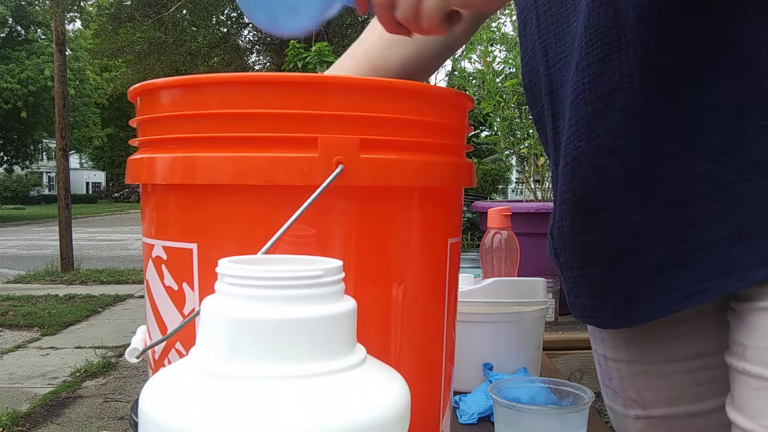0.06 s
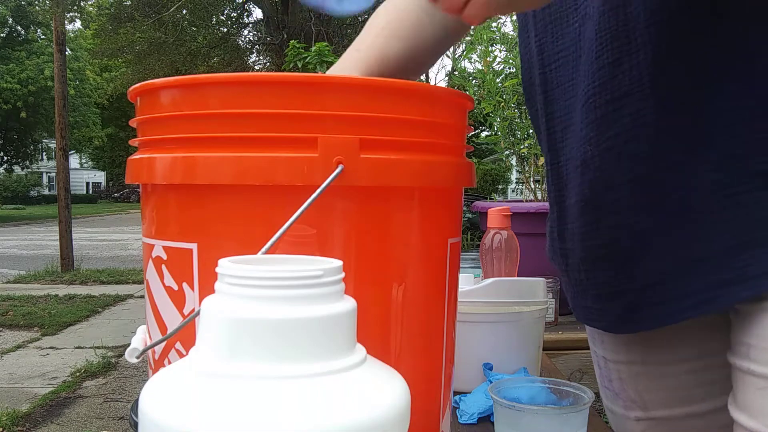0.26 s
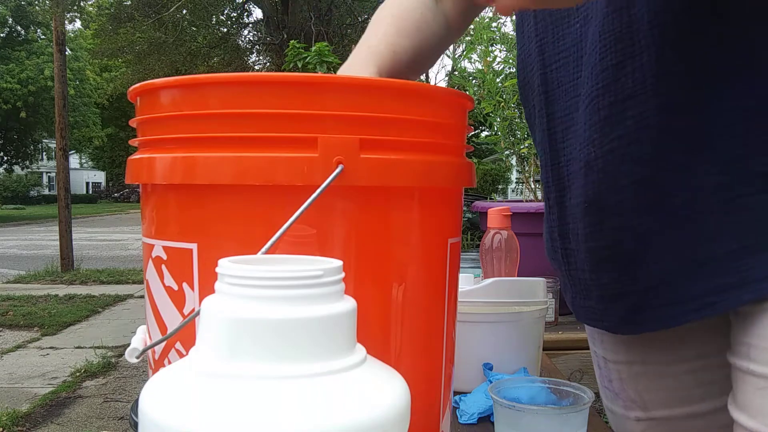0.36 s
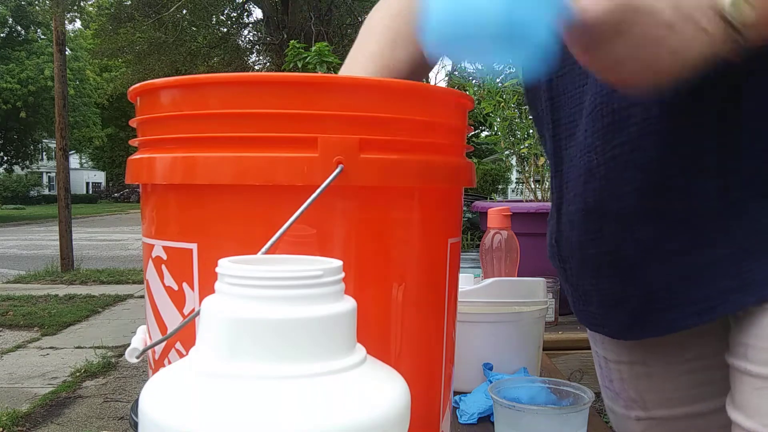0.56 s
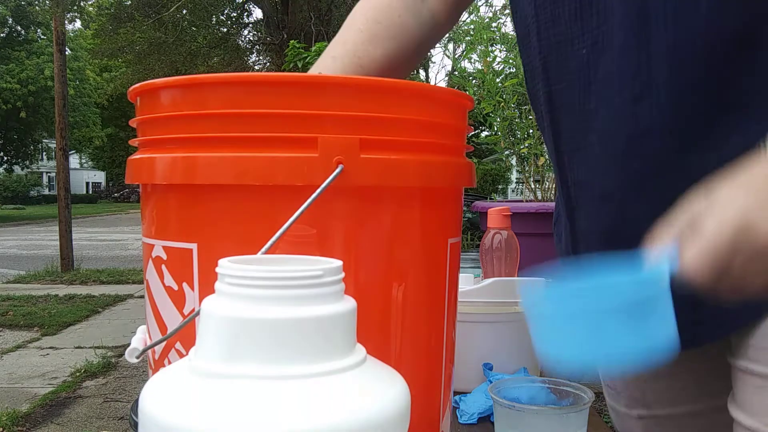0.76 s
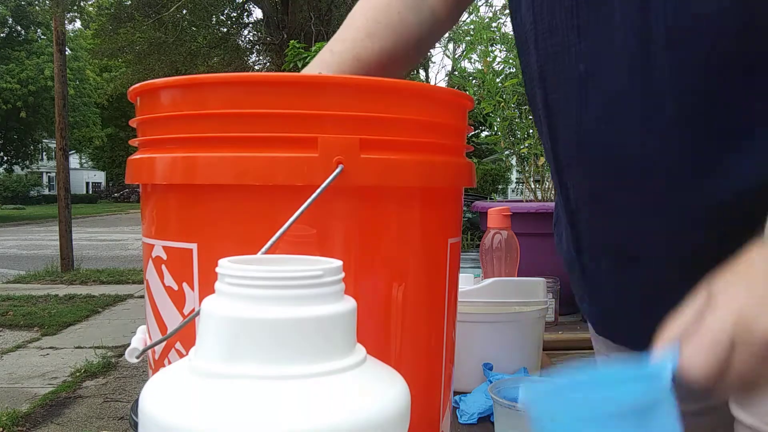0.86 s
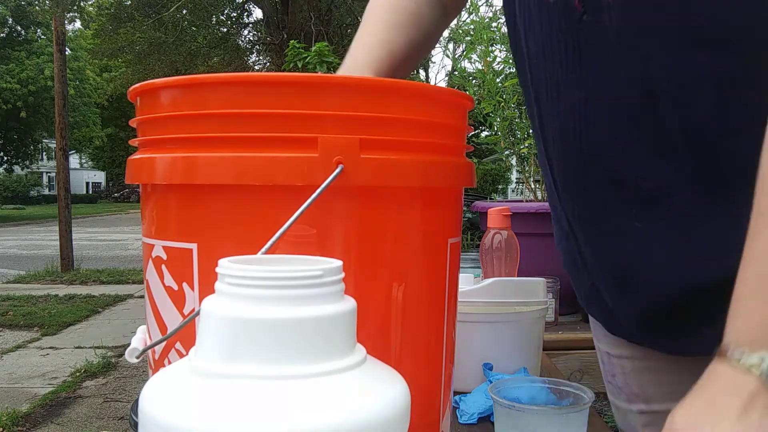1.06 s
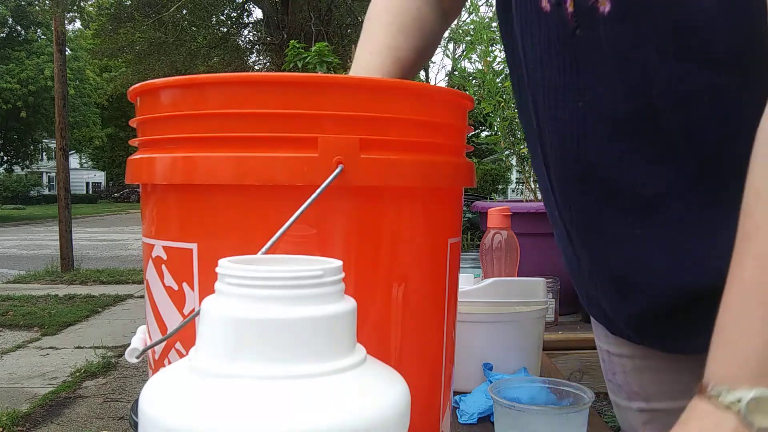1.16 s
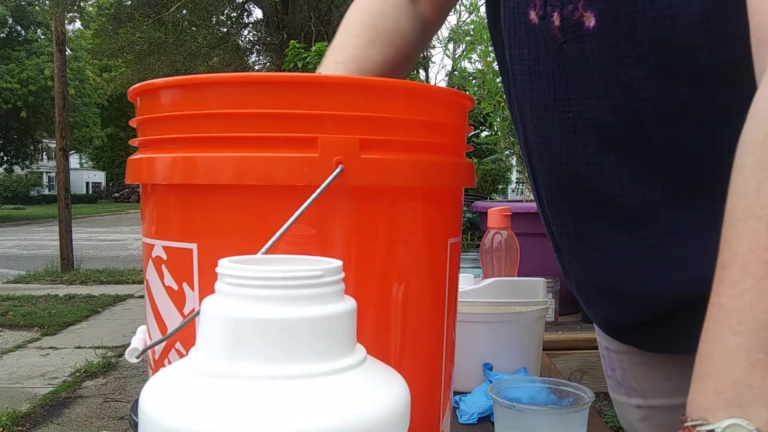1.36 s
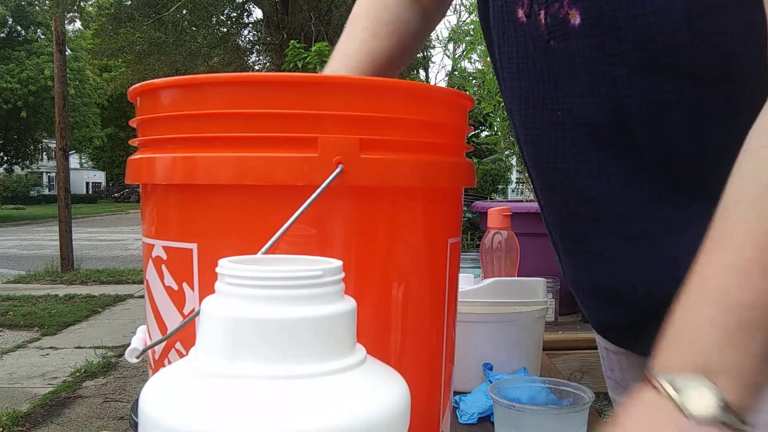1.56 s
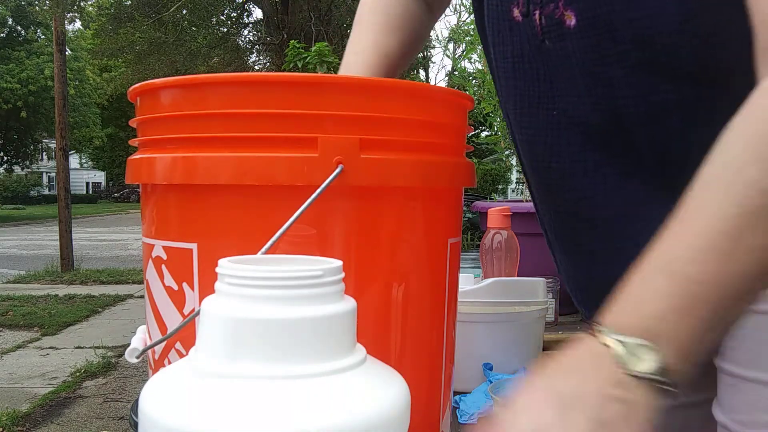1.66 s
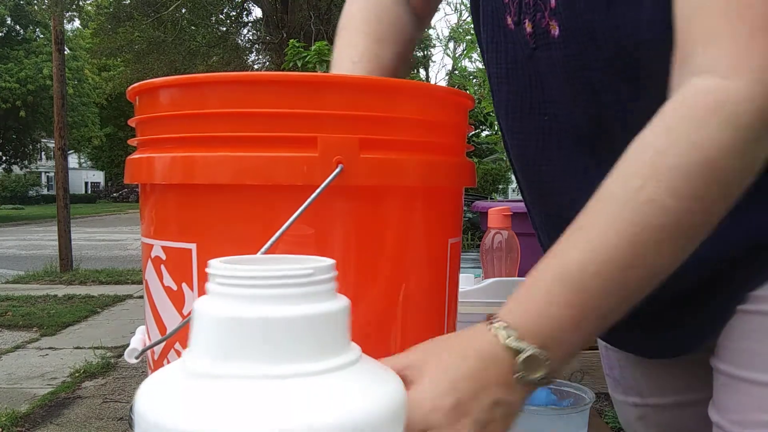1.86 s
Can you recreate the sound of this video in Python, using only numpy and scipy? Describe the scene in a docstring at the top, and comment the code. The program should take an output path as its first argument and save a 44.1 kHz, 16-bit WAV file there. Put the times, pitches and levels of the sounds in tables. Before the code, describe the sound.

Close and dry, a utensil clacks sharply on a hollow plastic bucket, then drags in uneven raspy strokes with small squeaks and duller bumps. Outdoors, a soft early hiss fades over quiet far traffic.

```python
"""A utensil stirs powder into water in a plastic bucket, outdoors and close by.
It knocks on the wall (decaying sines plus damped noise), then drags in gritty stick-slip strokes
(random pulses through wall filters); both ring the same bucket modes.
Now and then it springs free with a clink of its own modes, or squeaks and groans as a wavering tone.
Behind it: distant traffic and a fading hiss (filtered noise), one faint bird (a falling tone)."""
import sys
import numpy as np
from scipy import signal
from scipy.fft import rfft, irfft
from scipy.io import wavfile
from scipy.ndimage import uniform_filter1d, map_coordinates

SR = 44100
rng = np.random.default_rng(int(sys.argv[2]) if len(sys.argv) > 2 else 0)


def persist_wave(psi):
    """Save psi, clipped to +-1, as 16-bit WAV."""
    counts = np.round(np.clip(psi, -1, 1) * 32767).astype(np.int16)
    wavfile.write(sys.argv[1], SR, np.atleast_2d(counts).T)


N = 83790
TOP_HZ = 15850
CHATTER_HZ = 130  # rate of the fast level wander

# blows of the utensil: (time [s], ring level [dB], clack level [dB], hardness low-pass [Hz],
# bass cut [Hz], ring length [share of free t60])
BLOWS = [(0.1223, -63, -43.5, 14100, 199, 0.44), (.228, -44, -14.5, 5500, 890, 0.97),
         (.231, -14.5, -15.5, 3060, 280, 0.73), (0.243, -49, -29.5, 10000, 200, 0.49),
         (0.2541, -30, -25.5, 9700, 400, 0.2), (0.2709, -39, -29.5, 5000, 900, .4),
         (0.2847, -28.5, -23, 4530, 134, 0.9), (0.3169, -33, -32, 5200, 140, 0.89),
         (0.3423, -38, -29.5, 2980, 405, 0.53), (0.391, -36.5, -27, 1480, 1410, 1.6),
         (0.5575, -53, -37, 4950, 617, 1), (.632, -42.5, -37.5, 5000, 686, 1.5),
         (0.735, -37, -33.5, 9800, 496, 0.7), (.830, -61, -26.5, 8400, 4000, .8),
         (0.8309, -24.5, -25.5, 875, 600, 1.06), (1.001, -53, -30, 7700, 1490, 0.62),
         (1.3025, -12, -60, 1250, 1040, 0.32), (1.481, -20, -24.5, 3200, 476, 0.45),
         (1.4855, -15, -21.5, 1840, 890, 0.41), (1.691, -37, -24, 2440, 1010, 0.99),
         (1.811, -22.5, -39, 1250, 1050, 0.24), (1.8215, -28.5, -38, 1300, 600, 0.21),
         (1.8845, -37, -28.5, 4100, 600, 1.5)]
THUMP_S, THUMP_HZ, THUMP_T60_S, THUMP_DB = 0.229, 52, 0.05, -50


def knocks():
    """Each blow clacks and rings: soft contact loses treble, a glancing one bass; the hardest thumps."""
    out = np.zeros(N)
    t = np.arange(12288) / SR
    for start_s, ring_db, clack_db, hard_hz, low_hz, length in BLOWS:
        ringing = undb(ring_db) * 0.5 * ring(t, length)
        blow = ringing + undb(clack_db) * clack(t)
        blow = signal.lfilter(*signal.butter(2, low_hz, "high", fs=SR), blow)
        add(out, start_s, soften(cut_bass(blow), hard_hz))
    # the hardest blow rocks the whole bucket
    thump = np.sin(2 * np.pi * THUMP_HZ * t) * decay(t, THUMP_T60_S)
    add(out, THUMP_S, undb(THUMP_DB) * thump)
    return out


# ringing modes of the bucket: (frequency [Hz], level [dB], free t60 [s])
BUCKET_MODES = [(283.6, -19, 0.26), (374, -22.5, 0.19), (681, -3, 0.091), (782, 1.5, 0.14),
                (1091, -6.5, 0.12), (1154, -1.5, 0.081), (1246, -2, 0.13), (1401, -0.5, 0.05),
                (1820, -11, 0.063), (2140, -8.5, 0.057), (2960, -4.5, 0.11)]


def ring(t, length):
    """Bucket modes after one push; a utensil that stays on the wall shortens them."""
    out = np.zeros(len(t))
    for k, (hz, db, t60_s) in enumerate(BUCKET_MODES):
        sign = (-1) ** (k // 2)
        out += sign * undb(db) * np.sin(2 * np.pi * hz * t) * decay(t, t60_s * length)
    return out


# dense, quickly damped vibration of the plastic wall: (frequency [Hz], level [dB])
WALL_SPECTRUM = [(60, -74), (140, -19), (220, -8.5), (750, -6.5), (1400, 1), (2100, -8.5), (3100, 0),
                 (3500, -11.5), (6000, -6), (8500, -13), (15500, -18)]
# t60 at 1 kHz; it shortens as frequency to the power CLACK_DAMPING
CLACK_ATTACK_S, CLACK_T60_S, CLACK_DAMPING = 0.0013, 0.074, 0.51


def clack(t):
    """Countless wall modes, as noise, that build up fast and die sooner the higher they are."""
    noise = rng.standard_normal(len(t))
    spectrum = rfft(noise)
    hz = np.arange(len(spectrum)) * SR / len(t)
    octave = np.log2(np.clip(hz, 125, 16000) / 1000)
    out = np.zeros(len(t))
    for k in np.arange(-3, 5):  # octaves from 1 kHz
        weight = np.maximum(1 - abs(octave - k), 0)
        band = irfft(spectrum * weight, len(t))
        out += band * decay(t, CLACK_T60_S / 2 ** (k * CLACK_DAMPING))
    out *= np.minimum(t / CLACK_ATTACK_S, 1)
    return colour(out, WALL_SPECTRUM) / np.std(colour(noise, WALL_SPECTRUM))


# strokes along the wall, one list each:
# (time [s], rasp level [dB], treble relative to rasp [dB], bass relative to rasp [dB])
WALL_STROKES = [
    [(.25, -33.5, -17, -2), (.312, -36.5, -17, -2.5), (.37, -55.5, -18, -6)],
    [(.566, -45.5, -7.5, -24), (.595, -63, -35, -13)],
    [(.634, -34, -12, -14), (.688, -34, -17, -15), (.722, -42, -13.5, -16), (.756, -42.5, -8, -10),
     (.786, -55, -12, -5)],
    [(.84, -37, -12, -16), (.878, -45.5, -1.5, -11), (.898, -49, -26, -45)],
    [(1.004, -42.5, 1.5, -17), (1.022, -40, -11.5, -10.5), (1.045, -45, -8, -16), (1.108, -39, -14.5, -15),
     (1.132, -55, -49, 4)],
    [(1.301, -49, -4.5, 11.5), (1.352, -38, -13, -18), (1.368, -32.5, -12, -16.5),
     (1.426, -32.5, -15.5, -13), (1.455, -35.5, -16.5, -30), (1.468, -32.5, -11, -13.5),
     (1.566, -28.5, -16, -15.5), (1.605, -38, -6.5, -17.5), (1.675, -44.5, -8.5, -22),
     (1.708, -47, -13, -5), (1.735, -71, -29, 10)],
    [(1.776, -34.5, -12.5, -6), (1.798, -47.5, -9.5, 1), (1.853, -44.5, -10, -9.5), (1.866, -42.5, -7, -12)],
]
# wall rasp, grit hiss and wall flexing: (frequency [Hz], level [dB])
RASP_SPECTRUM = [(250, -32.5), (520, -10), (715, -4), (810, -1.5), (1350, 6.5), (1700, 3.5), (1950, -2),
                 (2250, 2), (2650, -6.5), (3050, -3.5), (3500, -20), (5200, -40.5)]
GRIT_SPECTRUM = [(2200, -34.5), (3700, -0.5), (4400, -2), (5700, 1), (8500, -14), (15500, -37)]
FLEX_SPECTRUM = [(150, -5), (280, 4.5), (430, 8.5), (900, -49)]
RASP_DB, RASP_RING_DB, GRIT_DB, FLEX_DB = -1, -12, 0, -5
SLIPS_PER_S, SLIP_SPREAD_DB, CHATTER_DB = 3400, 3.3, 1.6
STROKE_FADE_S = 0.003


def scrapes():
    """The utensil catches and slips on powder grains: the wall rasps, rings and flexes, grit hisses."""
    t = np.arange(N) / SR
    steps = np.minimum(rng.exponential(size=N), 4)
    sizes = undb(SLIP_SPREAD_DB * steps) * np.sign(rng.standard_normal(N))
    happens = rng.random(N) < SLIPS_PER_S / SR
    slips = happens * sizes * undb(CHATTER_DB * walk(CHATTER_HZ))

    rasp, grit, flex = np.zeros((3, N))
    for stroke in WALL_STROKES:
        s, db, treble_db, bass_db = np.array(stroke).T
        gate = np.clip(1 + np.minimum(t - s[0], s[-1] - t) / STROKE_FADE_S, 0, 1)
        rasp += gate * undb(np.interp(t, s, db))
        grit += gate * undb(np.interp(t, s, db + treble_db))
        flex += gate * undb(np.interp(t, s, db + bass_db))

    modes = ring(t[:N // 4], length=0.77)
    paths = [(rasp, RASP_DB, lambda x: colour(x, RASP_SPECTRUM)),
             (rasp, RASP_RING_DB, lambda x: signal.fftconvolve(x, modes)[:N]),
             (grit, GRIT_DB, lambda x: colour(x, GRIT_SPECTRUM)),
             (flex, FLEX_DB, lambda x: colour(x, FLEX_SPECTRUM))]
    out = np.zeros(N)
    for force, db, body in paths:
        out += undb(db) * body(slips * force) / np.std(body(slips))
    return out


RIM_LAG_S, RIM_SWING_S, RIM_ECHO, TRAVEL_HZ = 0.0028, 0.00031, 0.5, 12


def rim_echoes(x):
    """Waves return from the rim; as the contact travels, delays move and resonances shift."""
    out = x
    for k in range(1, 3):
        lag_s = RIM_LAG_S * np.sqrt(k) + RIM_SWING_S * walk(TRAVEL_HZ)
        echo = map_coordinates(out, [np.arange(N) - lag_s * SR], order=3)
        out = out + RIM_ECHO * echo
    return out / (1 + RIM_ECHO ** 2)


BASS_CUT_HZ = 139


def cut_bass(x):
    """Steep high-pass: deep bass falls away below BASS_CUT_HZ."""
    return signal.sosfilt(signal.butter(6, BASS_CUT_HZ, "high", fs=SR, output="sos"), x)


# bending modes of the utensil: (frequency [Hz], level [dB])
UTENSIL_MODES = [(1635, 0.5), (2280, -5.5), (2570, -6), (3400, -13), (3870, -7.5), (4900, -9)]
# the edge catches and springs free: (time [s], level [dB], hardness low-pass [Hz])
SPRINGS_FREE = [(.827, -21, 7000), (1.769, -33, 2200)]
UTENSIL_ATTACK_S, UTENSIL_T60_S = 0.006, 0.045


def clinks():
    """The utensil's own modes swell and die quickly when its edge springs off the wall."""
    out = np.zeros(N)
    t = np.arange(N // 8) / SR
    modes = np.zeros(len(t))
    for hz, db in UTENSIL_MODES:
        modes += undb(db) * np.sin(2 * np.pi * (hz * t + rng.random()))
    clink = modes * np.minimum(t / UTENSIL_ATTACK_S, 1) * decay(t, UTENSIL_T60_S)
    for start_s, db, hard_hz in SPRINGS_FREE:
        add(out, start_s, undb(db) * soften(clink, hard_hz))
    return out


# slipping locked to one resonance: (time [s], length [s], mean pitch [Hz], mean level [dB])
SQUEAKS_AND_GROANS = [(.62, 0.18, 811, -40), (0.733, 0.077, 279, -47.5), (1.324, 0.038, 3140, -42.5),
                      (1.367, 0.099, 1073, -33.5), (1.773, 0.048, 292.6, -45), (1.84, 0.029, 3025, -41)]
SQUEAK_WAVER, SQUEAK_WAVER_HZ, SQUEAK_FLUTTER_DB = 0.03, 670, 3.5  # waver as a share of pitch


def squeaks():
    """Slipping locks to one resonance and sings unsteadily: squeaks when high, groans when low."""
    out = np.zeros(N)
    for start_s, length_s, hz, db in SQUEAKS_AND_GROANS:
        n = int(length_s * SR)
        pitch_hz = hz * (1 + SQUEAK_WAVER * walk(SQUEAK_WAVER_HZ)[:n])
        level_db = db + SQUEAK_FLUTTER_DB * walk(CHATTER_HZ)[:n]
        add(out, start_s, tone(pitch_hz, level_db))
    return out


# distant traffic: (frequency [Hz], level [dB])
STREET_SPECTRUM = [(81, -28), (332, -8.5), (808, 2.5), (3400, -20), (4420, -14.5), (15500, -32)]
STREET_DB, STREET_WANDER_DB, STREET_WANDER_HZ = -57, 1.0, 10.1


def traffic():
    """Distant traffic: filtered noise with a slightly wandering level."""
    level = undb(STREET_DB + STREET_WANDER_DB * walk(STREET_WANDER_HZ))
    return level * unit(colour(rng.standard_normal(N), STREET_SPECTRUM))


# soft hiss: (frequency [Hz], level [dB])
HISS_SPECTRUM = [(200, -25), (800, 12.5), (1300, -7.5), (5200, -8.5), (9000, -26)]
HISS_DB, HISS_HALVED_S, HISS_FADE_S = -51, 0.37, 0.19


def fading_hiss():
    """Soft filtered noise with a fluttering level that dies away early on."""
    t = np.arange(N) / SR
    hiss = undb(HISS_DB + walk(CHATTER_HZ)) * unit(colour(rng.standard_normal(N), HISS_SPECTRUM))
    return hiss * (1 - np.tanh((t - HISS_HALVED_S) / HISS_FADE_S)) / 2


CHIRP_S, CHIRP_LENGTH_S, CHIRP_HZ, CHIRP_FALL_HZ, CHIRP_DB = 0.778, 0.038, 4420, 380, -58


def bird():
    """One faint chirp: a tone of linearly falling pitch."""
    out = np.zeros(N)
    fall = np.linspace(0, 1, int(CHIRP_LENGTH_S * SR))
    add(out, CHIRP_S, tone(CHIRP_HZ - CHIRP_FALL_HZ * fall, CHIRP_DB))
    return out


def undb(db):
    """Decibels to gain."""
    return 10 ** (np.asarray(db) / 20)


def unit(x):
    """Scale to rms 1."""
    return x / np.sqrt(np.mean(x ** 2) + 1e-20)


def decay(t, t60_s):
    """Exponential decay by 60 dB in t60_s."""
    return np.exp(-np.log(1000) * t / t60_s)


def soften(x, hard_hz):
    """Low-pass for contact hardness: a softer contact excites less treble."""
    return signal.lfilter(*signal.butter(2, min(hard_hz, TOP_HZ), fs=SR), x)


def tone(hz, db):
    """A short swelling and fading tone along a pitch track."""
    return undb(db) * np.hanning(len(hz)) * np.sin(2 * np.pi * np.cumsum(hz) / SR)


def colour(x, points):
    """Causal minimum-phase filter through (frequency [Hz], level [dB]) points."""
    size = 4096
    hz, db = np.array(points, float).T
    grid_hz = np.arange(size // 2 + 1) * SR / size
    gain = undb(np.interp(np.log(grid_hz + 1), np.log(hz), db))
    # folding the cepstrum makes the response minimum-phase
    cep = irfft(np.log(gain))
    cep[1:size // 2] *= 2
    cep[size // 2 + 1:] = 0
    return signal.fftconvolve(x, irfft(np.exp(rfft(cep))))[:len(x)]


def walk(rate_hz):
    """Smooth random wandering with rms 1."""
    k = max(int(SR / rate_hz), 1)
    steps = np.repeat(rng.standard_normal(N // k + 1), k)
    return unit(uniform_filter1d(steps, k)[:N])


def add(out, start_s, x):
    """Mix a sound in at a given time."""
    i = max(int(start_s * SR), 0)
    out[i:i + len(x)] += x[:max(N - i, 0)]


def scene():
    """The stirring in front of the street."""
    rubbing = cut_bass(rim_echoes(scrapes()) + squeaks())
    stirring = knocks() + clinks() + rubbing
    return (stirring + traffic() + fading_hiss() + bird())[None]


def record(dry):
    """Steep low-pass at TOP_HZ: the recorder cuts the top."""
    return signal.sosfilt(signal.ellip(10, 0.2, 70, TOP_HZ, fs=SR, output="sos"), dry)


dry = scene()
out = record(dry)
persist_wave(out)
```